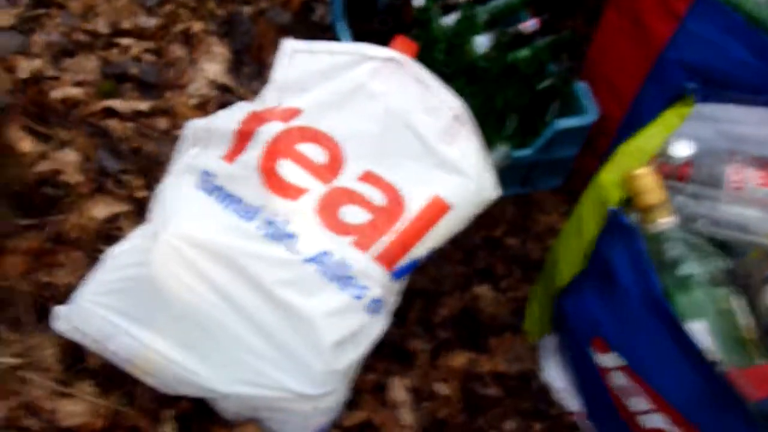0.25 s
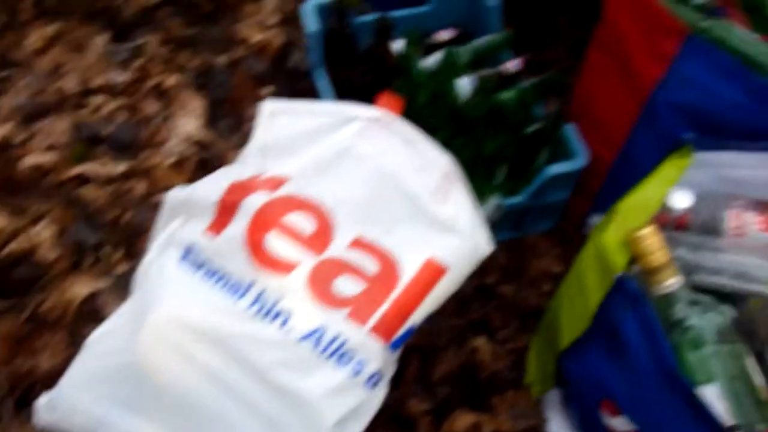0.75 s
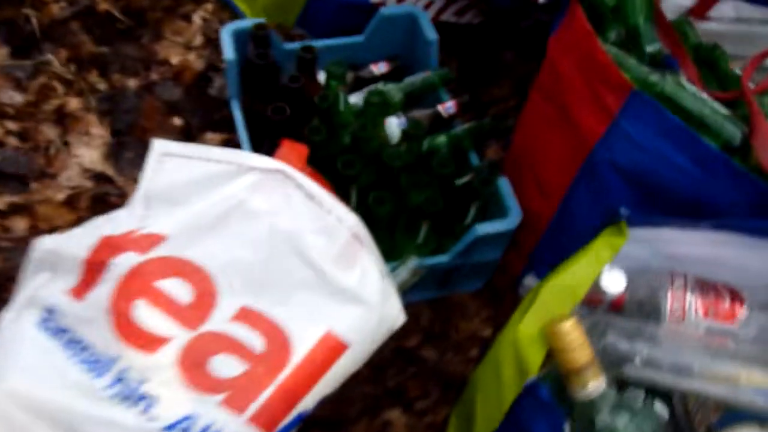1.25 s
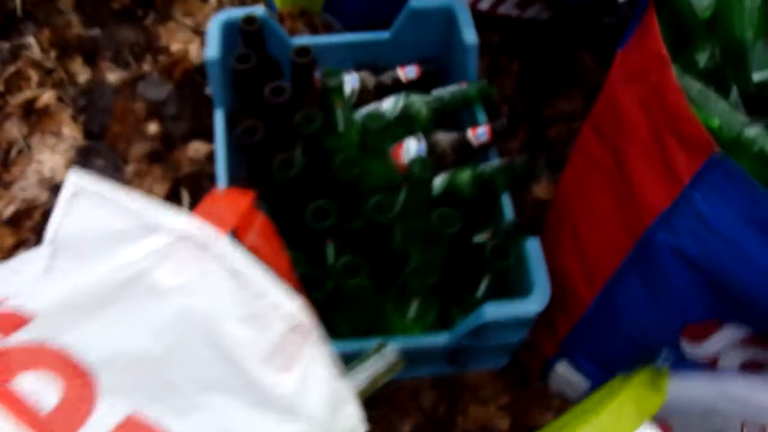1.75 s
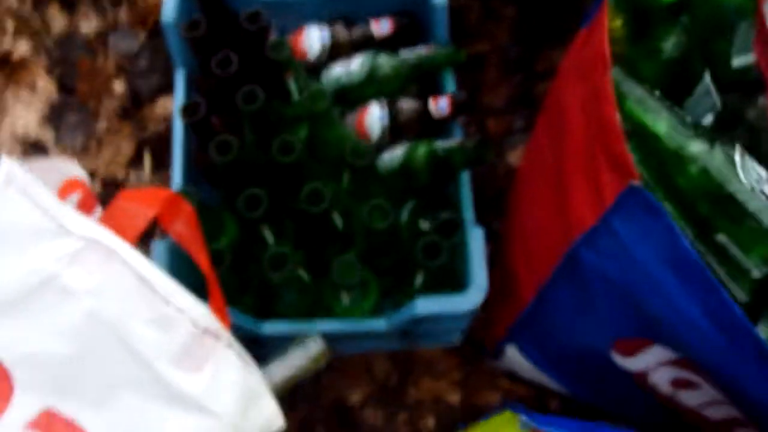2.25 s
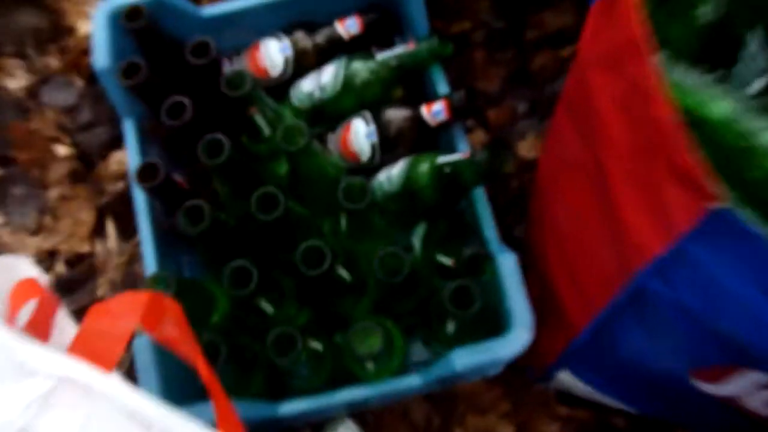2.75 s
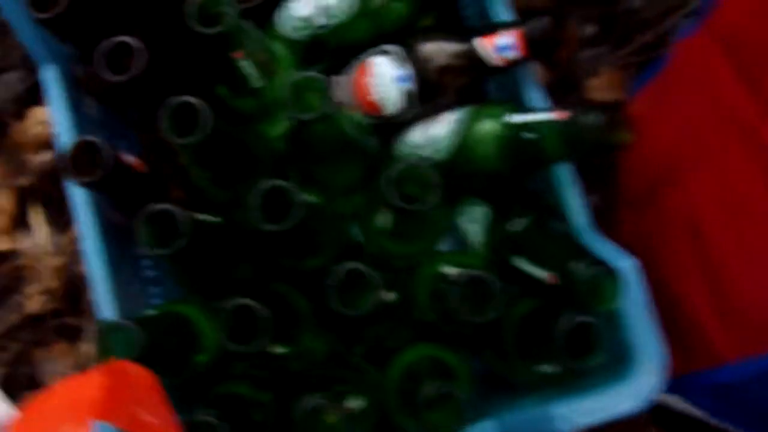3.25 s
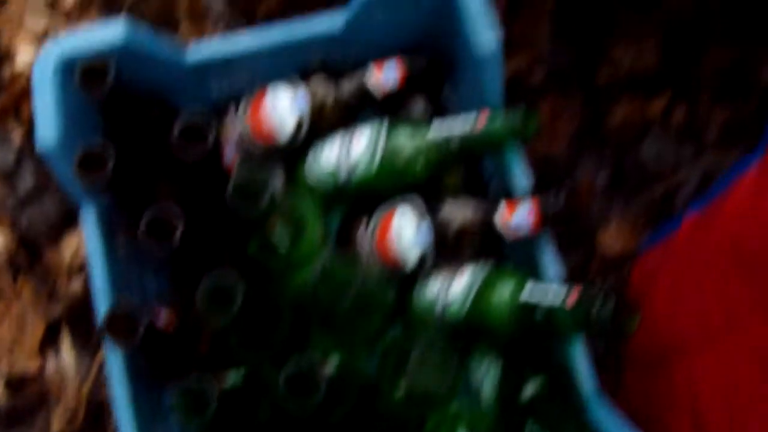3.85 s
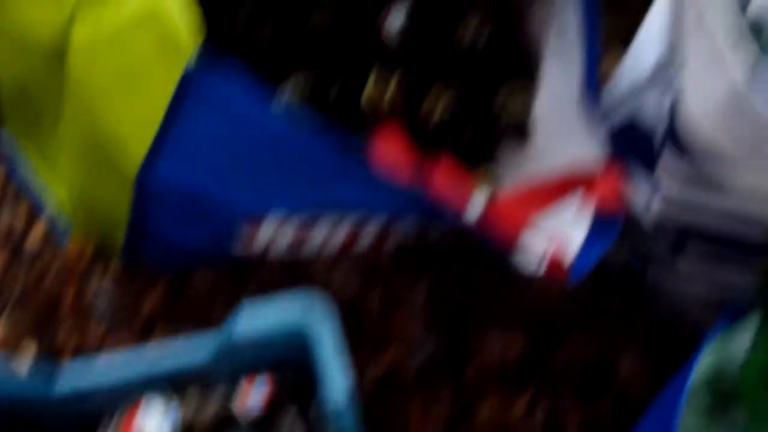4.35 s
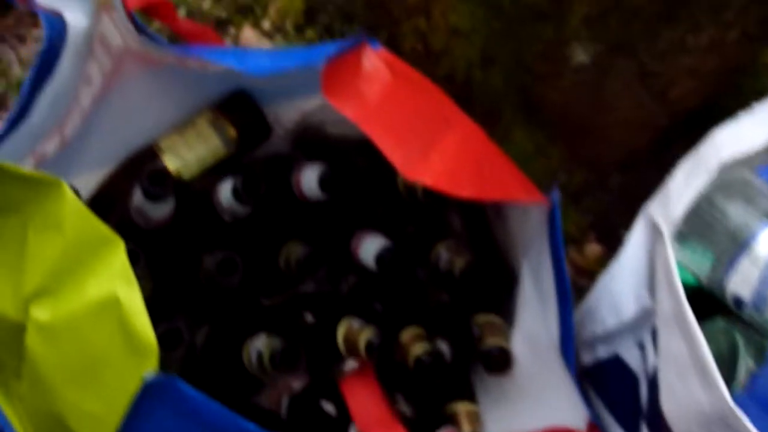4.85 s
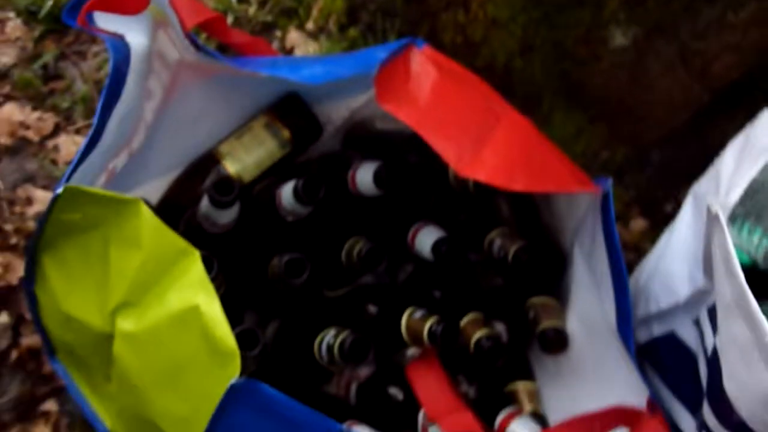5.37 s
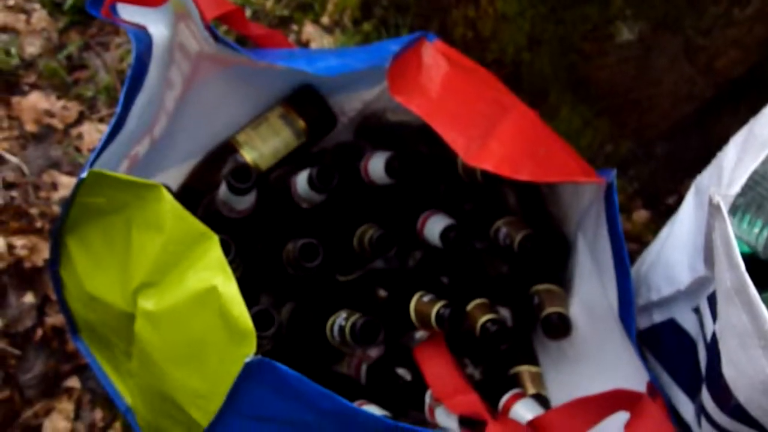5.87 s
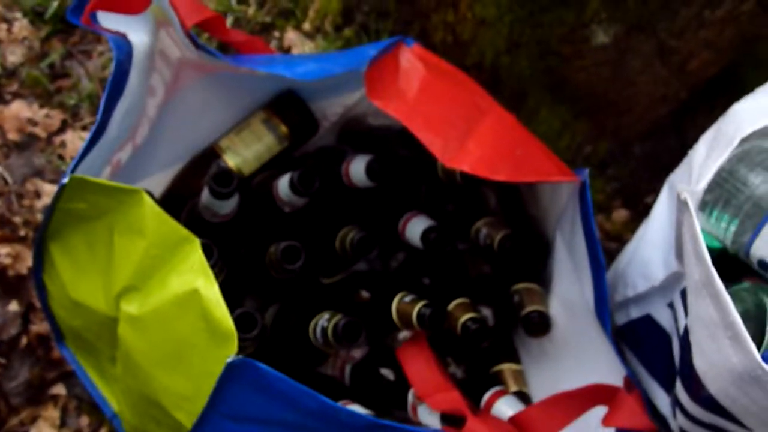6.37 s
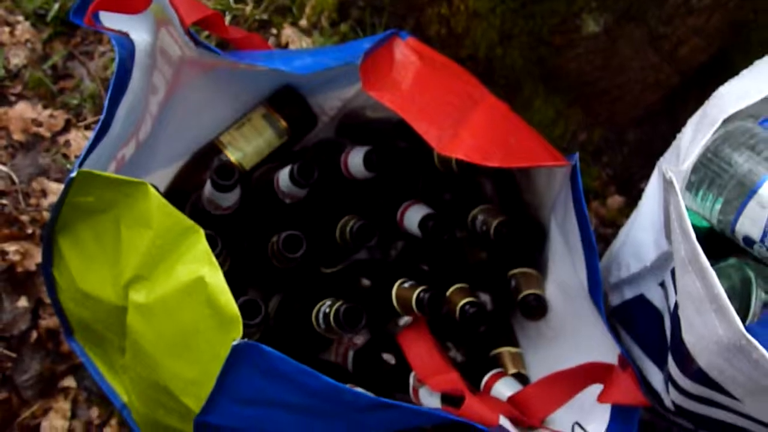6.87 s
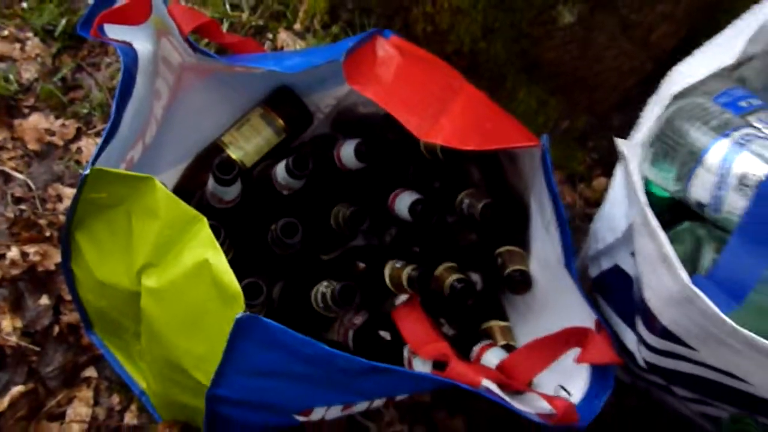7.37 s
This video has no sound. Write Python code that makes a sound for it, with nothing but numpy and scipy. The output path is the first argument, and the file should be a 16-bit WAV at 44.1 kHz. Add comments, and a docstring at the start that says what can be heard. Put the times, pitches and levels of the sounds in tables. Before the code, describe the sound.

Close, dry pops of rain on plastic film with crisp splashy ticks, fine leaf patter, a brief glass clink and barely audible bird whistles.

```python
"""Rain drops thud on stretched plastic film as decaying resonances and crack as they splash in noise bursts.
Under them a patter of tiny rings and noise grains swells as film and dead leaves rustle in light rain.
A few drops sound bottles (decaying sines), glass clinks, a far bird whistles and a low rumble lies below.
A hand-held camera with two close ports hears it through three fixed notches and a top cut."""
import sys
import numpy as np
from scipy import signal
from scipy.fft import rfft, irfft
from scipy.io import wavfile

SR = 44100
rng = np.random.default_rng(int(sys.argv[2]) if len(sys.argv) > 2 else 0)


def store_pcm(level_fs):
    """Save levels as 16-bit WAV."""
    pcm = np.round(np.clip(level_fs, -1, 1) * 32767).astype(np.int16)
    wavfile.write(sys.argv[1], SR, np.atleast_2d(pcm).T)


N = 336042


def from_db(db):
    """Decibels to amplitude gain."""
    return 10 ** (np.asarray(db) / 20)


def rms_one(x):
    """Scale to rms 1."""
    return x / np.sqrt(np.mean(x ** 2) + 1e-20)


def first_rms(x, count=100):
    """Rms of the first samples of a sound's mid."""
    return np.sqrt(np.mean(x[0, :count] ** 2))


def colour(x, points, size=4096):
    """Causal (minimum-phase) filter with the given (Hz, dB) response."""
    hz, db = np.transpose(points)
    grid_hz = np.maximum(np.arange(size // 2 + 1) * SR / size, 1)
    log_gain = np.interp(np.log(grid_hz), np.log(hz), db) * np.log(10) / 20
    # folding the cepstrum onto positive time makes the phase minimal
    cepstrum = irfft(log_gain)
    cepstrum[1:size // 2] *= 2
    cepstrum[size // 2 + 1:] = 0
    response = irfft(np.exp(rfft(cepstrum)))
    return signal.oaconvolve(np.atleast_2d(x), response[None], axes=1)[:, :N]


def ring(x, hz, t60_s):
    """Two-pole resonator: a unit click starts a decaying sine of height about 1."""
    radius = from_db(-60 / (t60_s * SR))
    w = 2 * np.pi * hz / SR
    return signal.lfilter([0, np.sin(w)], [1, -2 * radius * np.cos(w), radius * radius], x)


def add(out, start_s, sound):
    """Mix a short sound in at its start time."""
    i = round(start_s * SR)
    out[..., i:i + sound.shape[-1]] += sound[..., :N - i]


def leaning(pair, lean):
    """Mid and side; a source off centre puts a share of mid into side."""
    lean = np.clip(lean, -.95, .95)
    mid, side = pair
    return np.array([mid, lean * mid + np.sqrt(1 - lean ** 2) * side])


def drift(rate_hz):
    """Slow random curve: normal points of spread 1 joined by straight lines."""
    points = rng.standard_normal(int(N / SR * rate_hz) + 2)
    return np.interp(np.arange(N) / SR * rate_hz, np.arange(len(points)), points)


def lesser(columns, count):
    """Rows of drops at random moments, each column drawn evenly around its mean."""
    mean, scatter = np.transpose(columns)
    draws = rng.random((count, len(columns) + 1))
    start_s = draws[:, 0] * N / SR
    # sqrt(12) gives the even draw a standard deviation of scatter
    values = mean + scatter * np.sqrt(12) * (draws[:, 1:] - .5)
    return np.column_stack([start_s, values])


def low_end(length=3000):
    """Far rumble as coloured noise; soft low pushes as sines decaying over a few cycles."""
    # Each row: frequency in Hz, response in dB.
    rumble_response = [(20, -7), (40, -1), (55, 1), (100, -0.5), (150, -8.5), (300, -14), (2000, -67)]
    # Each row: start in seconds, level in dB, pitch in Hz.
    pushes = [(1.127, -22, 219), (1.298, -23, 226), (2.411, -21, 190), (2.481, -34, 110), (4.035, -25, 326),
              (4.642, -24, 312), (5.282, -34.5, 90)]
    rumble_db = -60.5
    out = from_db(rumble_db) * rms_one(colour(rng.standard_normal((2, N)), rumble_response))
    t = np.arange(length) / SR
    for start_s, db, hz in pushes:
        swing = (1 - np.exp(-t * hz * 8.2)) * from_db(db - 60 * t * hz / 6.1)
        add(out[0], start_s, swing * np.sin(2 * np.pi * hz * t))
    return out * [[1], [1.6]]


def bird():
    """Faint whistles, sines of slightly wavering pitch, off to the left."""
    # Each row: start in seconds, length in seconds, pitch in Hz, level in dB.
    whistles = [(3.49, 0.083, 3980, -53.5), (3.704, 0.26, 3210, -64), (6.496, .09, 4070, -54)]
    out = np.zeros(N)
    waver = 1 + 0.049 * drift(rate_hz=220)
    for start_s, length_s, hz, db in whistles:
        span = slice(round(start_s * SR), round((start_s + length_s) * SR))
        phase = 2 * np.pi * hz * np.cumsum(waver[span]) / SR
        out[span] += from_db(db) * np.sqrt(np.hanning(len(phase))) * np.sin(phase)
    return np.array([out, .5 * out])


def bottles(length=12000):
    """Air in bottle necks hums; glass rings in several modes until the bottles settle together."""
    # Each row: start in seconds, level in dB, pitch in Hz, 60 dB decay time in seconds.
    hums = [(.132, -34, 570, 0.19), (2.417, -11, 537, 0.17), (2.434, -42.5, 115, 1),
            (4.559, -35, 567, 0.21)]
    # Glass on glass. Each row: start in seconds, level in dB.
    strikes = [(2.493, -33), (2.512, -31.5), (2.531, -32)]
    # Each row: mode pitch in Hz, level against the strike in dB, 60 dB decay time in seconds.
    modes = [(2249, 0, .5), (2297, -3, .4), (2869, -1, .1), (3596, -8, .2), (4969, -11, .12),
             (6013, -15, .15), (6257, -10, .15), (6428, -14, .15)]
    settle_s, settle_t60_s, hum_end_s = 2.57, 0.06, .17
    air, glass, t = np.zeros(N), np.zeros(N), np.arange(length) / SR
    for start_s, db, hz, t60_s in hums:
        swing = from_db(db - 60 * t / t60_s) * (1 - np.exp(-t / 0.0012))
        add(air, start_s, swing * np.sin(2 * np.pi * hz * t) * (t < hum_end_s))
    for start_s, db in strikes:
        for hz, mode_db, t60_s in modes:
            add(glass, start_s, from_db(db + mode_db - 60 * t / t60_s) * np.sin(2 * np.pi * hz * t))
    glass *= from_db(-60 * np.maximum(np.arange(N) / SR - settle_s, 0) / settle_t60_s)
    return np.array([air + glass, .6 * air + 0.99 * glass])


def impacts(per_s, spread_db, clump_db):
    """Clicks at random moments, many small and few large, coming in clumps."""
    chance = per_s / SR * from_db(clump_db * drift(rate_hz=25))
    struck = rng.random(N) < chance
    return from_db(spread_db * np.minimum(rng.exponential(1, N), 3)) * struck


def small_taps(clicks, count=12):
    """Each small drop rings one of a set of film patches for a few cycles at the patch's pitch."""
    out, patch = np.zeros((2, N)), rng.integers(0, count, N)
    for k, hz in enumerate(np.geomspace(330, 1900, count)):
        push = np.diff(clicks * (patch == k), prepend=0) + 1e-18
        tap = ring(ring(push, hz, 2.9 / hz), hz, 2.9 / hz)
        out += [tap, tap * (-1) ** k]   # patches alternate in side
    return rms_one(out)


def grains(spectrum, clicks, grain_s, smooth, count=4):
    """Noise over a smooth far part; each impact flares and dies away in one of a few broad bands."""
    out = smooth * from_db(drift(rate_hz=15.0)) * rng.standard_normal((2, N))
    dealt = rng.integers(0, count, N)
    click_rms = np.sqrt(np.mean(clicks ** 2))
    decay = np.exp(-1 / (grain_s * SR))
    for k, hz in enumerate(np.geomspace(2600, 11000, count)):
        flares = signal.lfilter([1], [1, -decay], clicks * (dealt == k) / click_rms + 1e-18)
        band = signal.butter(1, [hz / 1.54, min(hz * 1.33, .45 * SR)], "band", fs=SR, output="sos")
        out += signal.sosfilt(band, flares * rng.standard_normal((2, N)))
    return rms_one(colour(out, spectrum))


def rustle_gain():
    """Gain of the dull and the bright part: steady rain plus rustling swells, added as power."""
    # Steady rain. Each row: time in seconds, dull part in dB, bright part in dB.
    steady = [(0, -50, -51.5), (1.1, -50, -51.5), (2.3, -49.5, -54.5), (3.2, -51, -53.5),
              (4.2, -53.5, -54.5), (4.4, -47.5, -52.5), (4.75, -48, -51), (5.3, -52.5, -56.5),
              (5.9, -54.5, -55), (6.45, -51, -52), (7.2, -53.5, -55.5), (7.62, -50.5, -53.5)]
    # Film and leaves. Each row: peak time, rise and fall in seconds, dull part in dB, bright part in dB.
    rustles = [(0.277, 0.1, 0.13, -45, -45.5), (0.62, 0.097, 0.2, -45, -48.5),
               (.74, 0.11, 0.084, -59, -45.5), (1.29, 0.017, 0.036, -46, -53),
               (1.355, 0.03, 0.041, -35, -42.5), (1.51, 0.11, 0.37, -54.5, -53.5),
               (1.906, 0.073, .14, -47, -51), (2.13, .07, 0.091, -47, -53),
               (2.422, 0.014, 0.12, -35, -40.5), (2.67, 0.13, 0.14, -39.5, -36.5),
               (2.812, 0.094, 0.097, -44, -48), (3.066, 0.074, 0.04, -50, -51.5),
               (3.635, 0.011, 0.045, -52, -56), (4.18, 0.015, 0.054, -54, -48.5),
               (4.35, 0.054, .06, -64, -62), (4.65, 0.011, 0.028, -43, -59), (5.368, .03, .07, -53, -60),
               (6.106, .1, .06, -65, -66), (6.829, .03, 0.05, -52, -70), (6.969, .08, 0.076, -66, -56)]
    edge_db = -9   # one rise before or one fall after the peak
    t = np.arange(N) / SR
    time_s, *steady_db = np.transpose(steady)
    power = np.array([from_db(2 * np.interp(t, time_s, db)) for db in steady_db])
    for peak_s, rise_s, fall_s, *db in rustles:
        away = np.maximum((peak_s - t) / rise_s, (t - peak_s) / fall_s)
        shape = from_db(2 * edge_db * np.minimum(away, 5) ** 2)
        power += np.outer(from_db(2 * np.array(db)), shape)
    return np.sqrt(power)


def patter():
    """Countless small drops: dull on the film, bright on the leaves; film drops sound in both ways."""
    # Each row: frequency in Hz, response in dB.
    dull_response = [(60, -39), (150, 0), (300, 1), (600, 1), (1000, 2), (1500, 1), (2200, -6.5),
                     (3500, -21.5), (8000, -38)]
    # Each row: frequency in Hz, response in dB.
    bright_response = [(200, -68), (700, -26), (1800, -13), (3000, 0.5), (4000, 2), (6300, 1.5), (9000, -1),
                       (12000, -4), (15500, -6)]
    # Where the patter is thickest. Each row: time in seconds, lean to the left from -1 to 1.
    lean_path = [(0, 0.16), (2.3, .1), (2.5, 0.48), (3.2, 0.039), (3.6, 0.15), (4.2, 0.023), (4.6, .15),
                 (5.1, 0.014), (7.62, 0.087)]
    t = np.arange(N) / SR
    dull_gain, bright_gain = rustle_gain()
    on_film = impacts(per_s=250., spread_db=3.5, clump_db=5.0)
    on_leaves = impacts(per_s=250., spread_db=2.5, clump_db=7.5)
    dull = rms_one(colour(rng.standard_normal((2, N)), dull_response)) + 0.75 * small_taps(on_film)
    bright = grains(bright_response, on_film + on_leaves, grain_s=0.0013, smooth=4.4)
    both = dull_gain * rms_one(dull) + bright_gain * bright
    # steady fine hiss of far rain
    treble = signal.butter(2, 9000, "high", fs=SR, output="sos")
    both += from_db(-64.0) * signal.sosfilt(treble, rng.standard_normal((2, N)))
    return leaning(both, np.interp(t, *np.transpose(lean_path)))


def cracks(length=2500):
    """Splash: a noise burst, sharpest at the start, with a broad peak, a top octave and a tail of spray."""
    # Each row: start in seconds, level in dB, centre in Hz, top octave against the body in dB,
    # left-right balance in nominal dB (positive is left).
    splashes = [(.027, -44, 3440, -9, -2), (.1282, -47, 5870, -14, 5), (0.167, -42, 6060, -17, 2),
                (0.33, -41, 4660, 0, 1), (.412, -43, 6300, -11, -3), (0.435, -37.5, 4440, -10, 10),
                (0.6152, -38.5, 6000, -7, -4), (.703, -39, 7100, -7, -2), (.84, -39, 5150, -10, 9),
                (0.8866, -38.5, 6640, -25, 1), (0.9783, -46.5, 6540, 8.5, 4), (1.0599, -38, 6250, 3.5, 7),
                (1.1276, -23.5, 5700, -0.5, 6), (1.2172, -32.5, 4400, -12, -2),
                (1.2822, -30.5, 5710, -22, 5), (1.3, -21.5, 5680, -29, 11), (1.362, -35, 5780, -11, -3),
                (1.3722, -35, 6450, -9, -5), (1.489, -37.5, 6600, -12, 13), (1.609, -38, 4270, -3, -4),
                (1.6225, -39, 5060, -8, 12), (2.4134, -44, 3540, -13, 8), (2.4402, -28, 5940, -8, 12),
                (2.4832, -36, 3330, -11, 1), (2.6738, -28, 6000, -14, 13), (2.713, -34, 6430, -3, 3),
                (2.789, -28.5, 4130, -10, -1), (2.8266, -35, 5150, 4, -4), (2.9561, -36, 6500, -15, 11),
                (3.0366, -31, 4100, -10, 18), (3.0884, -37.5, 4560, -6, 9), (3.2527, -43, 6300, 0.5, -4),
                (3.33, -42.5, 4100, -10, 9), (3.4713, -43.5, 6140, 0.5, 7), (3.6273, -37.5, 6750, -22, 1),
                (4.037, -31, 4850, -35, -17), (4.175, -35.5, 5560, -12, 16), (4.303, -43, 4520, -8, -1),
                (4.3311, -41, 5860, -12, 1), (4.3665, -35.5, 6700, -27, 4), (4.644, -30, 5920, -20, 12),
                (4.7437, -41, 6500, -13, 2), (4.7685, -39, 5500, -11, 20), (4.908, -37, 6360, -1, 2),
                (4.9148, -35.5, 6660, -30, -11), (5.0997, -43, 5600, -10, -11), (5.1968, -45, 6070, 1, -11),
                (5.3058, -45.5, 5390, 5.5, 4), (5.3289, -42.5, 4540, -1, -2), (5.359, -41, 5350, -8, -14),
                (5.379, -38.5, 6880, -16, -10), (5.5053, -42, 5530, -9, 9), (5.7686, -39.5, 3800, -3, 4),
                (5.9454, -49, 4470, 4.5, 0), (6.09, -44, 5330, -18, 9), (6.12, -42, 5350, 2, 6),
                (6.527, -38, 3340, 0, 10), (6.6147, -40.5, 4020, 0.5, 9), (6.7835, -41, 4040, -11, 5),
                (6.8354, -40, 6100, 0, -1), (7.1237, -48, 6340, 2, -5), (7.2037, -44, 6280, -15, 8),
                (7.224, -42, 5780, -11, 8), (7.271, -41, 4540, 2.5, 8), (7.33, -45.5, 5200, -18, -2)]
    # Random lesser cracks, a row for each of level (dB), centre (Hz), top octave (dB), balance (dB): mean, scatter.
    lesser_spread = [(-48, 2.3), (5500, 810), (-4.5, 4.3), (2.5, 6)]
    spray_at_38_db, spray_spread_db, spray_loss = -13, 1, 0.23   # loss: dB per dB of crack above -38 dB
    spray_t60_s, burst_decay_s, attack_s = 0.048, 0.00067, 0.00027
    out, t = np.zeros((2, N)), np.arange(length) / SR
    top = signal.butter(1, [8500, 12500], "band", fs=SR, output="sos")
    drops = np.vstack([lesser(lesser_spread, count=33), splashes])
    wetness = rng.standard_normal(len(drops))
    noise = rng.standard_normal((len(drops), 2, length))
    for (start_s, db, hz, top_db, pan_db), wet, hiss in zip(drops, wetness, noise):
        spray_db = spray_at_38_db + spray_spread_db * wet - spray_loss * (db + 38)
        envelope = np.exp(-t / burst_decay_s) + from_db(spray_db - 60 * t / spray_t60_s)
        burst = hiss * envelope * (1 - np.exp(-t / attack_s))
        body = signal.lfilter([1, 0, -1], 1, ring(burst, hz, 2.96 / hz))
        air = signal.sosfilt(top, burst)
        sound = body / first_rms(body) + from_db(top_db) * air / first_rms(air)
        add(out, start_s, from_db(db) * leaning(sound, np.tanh(pan_db / 12)))
    return out


def thuds(length=3000):
    """The blow swings the film for a few cycles; it then flutters as noise around that pitch."""
    # Each row: start in seconds, peak of the blow in dB, film pitch in Hz,
    # sharpness (the ring lasts longer as it grows), flutter against the blow in dB.
    blows = [(.0283, -25.5, 800, 3.5, -11), (.1143, -27, 1200, 1.06, -32), (.1285, -24, 794, 1.4, -6),
             (.2568, -29, 586, 4.4, -25), (.3299, -19, 620, 7.6, -29), (.4121, -31.3, 1580, 4.5, -30),
             (.4346, -28.5, 1280, 8.5, -16), (.5008, -30, 1050, 2.4, -30), (.5446, -28, 650, 2.9, -6),
             (.612, -33, 800, 2.2, -3), (.6285, -32, 600, 2, -2), (.6485, -26, 1200, 5.4, -25),
             (0.704, -31, 680, 2.7, -30), (1.0604, -30, 1650, 4, -18), (1.1156, -35, 328, 2.1, -4),
             (1.1283, -10, 960, 1.9, -20), (1.2173, -11.5, 945, 3.2, -17.5), (1.2822, -14, 930, 1.8, -22),
             (1.2908, -31, 1200, 1.5, -16), (1.3003, -11, 800, 3.4, -8.5), (1.306, -30, 900, 2.7, -19),
             (1.6742, -25, 566, 2, -11), (1.7176, -28.5, 1260, 1.9, -12), (1.7568, -29, 960, 1.9, -31),
             (1.8922, -30, 1340, 5.7, -6), (2.1169, -25.5, 1360, 7.3, -14),
             (2.4111, -12.5, 1270, 4.7, -6.5), (2.484, -1.6, 1223, 11, -19), (2.4925, -16.5, 905, 2.9, -17),
             (2.511, -24.5, 780, 5.9, -21), (2.6195, -26.5, 800, 2, -8), (2.6974, -23.5, 710, 4.8, -30),
             (2.7128, -21.5, 870, 2.8, -27), (2.7893, -19.5, 544, 0.87, -13),
             (2.8272, -21.5, 1610, 1.5, -32), (2.8485, -23, 710, .63, -13), (2.8919, -23, 813, 2.5, -8.5),
             (2.9562, -29.5, 890, 0.88, -9), (3.0364, -28.5, 870, 5.1, -3), (3.0886, -32.5, 960, 3.5, -2.5),
             (3.6416, -33.5, 805, 3.1, -1.5), (3.6954, -32, 1200, 5.7, -14), (4.037, -14, 724, .51, -10.5),
             (4.1758, -33, 890, 1.4, -9), (4.3476, -30, 600, 1.8, -30), (4.3925, -30, 855, 1.1, -12),
             (4.643, -17, 910, 8, -7), (4.658, -29, 900, 2, -14), (4.6936, -23, 870, 4.5, -32),
             (4.9146, -33.5, 1220, 2.5, -18), (5.3598, -28, 660, 2.4, -3), (5.3807, -27.5, 520, 2, -31),
             (5.5676, -29.5, 566, 6.7, -6.5), (6.0233, -40.5, 1630, 18, -24), (6.041, -36, 530, 8.2, -31),
             (6.0897, -34.5, 1530, 3.6, -7), (6.3633, -33.5, 890, 3.5, -13), (6.6153, -35, 780, 1.2, -30),
             (6.6351, -29, 800, 1.7, -9.5), (6.8141, -21, 1010, 3.5, -11.5), (6.9858, -29, 730, 1.2, -25.5),
             (7.2714, -38, 510, 2.3, -3.5), (7.331, -30.5, 970, 1.4, -7.5)]
    # Random lesser thuds, a row for each of peak (dB), pitch (Hz), sharpness, flutter (dB): mean, scatter.
    lesser_spread = [(-38.5, 3.8), (854, 210), (2.5, 0.54), (-11, 6.1)]
    flutter_t60_s, flutter_attack_s = 0.041, 0.00027
    out, t = np.zeros((2, N)), np.arange(length) / SR
    drops = np.vstack([lesser(lesser_spread, count=30), blows])
    noise = rng.standard_normal((len(drops), length))
    push = np.diff(1. * (t == 0), prepend=0)
    for (start_s, db, hz, sharpness, flutter_db), hiss in zip(drops, noise):
        t60_s = 0.68 * max(sharpness, .6) / hz   # of each of two resonators in series
        blow = ring(ring(push, hz, t60_s), hz, t60_s)
        flutter = rms_one(ring(np.diff(hiss, prepend=0), hz, 3.8 / hz))
        flutter = flutter * from_db(flutter_db - 60 * t / flutter_t60_s)
        sound = blow / np.abs(blow).max() + flutter * (1 - np.exp(-t / flutter_attack_s))
        random_sign = np.sign(hiss[0])   # puts the drop on either side
        add(out, start_s, from_db(db) * np.array([sound, sound * random_sign]))
    return out


def scene():
    """All sources as mid and side; the close ports hear little side below the treble."""
    # Side against mid. Each row: frequency in Hz, gain in dB.
    side_response = [(60, -32), (99, -23), (160, -23.5), (270, -21.5), (450, -21.5), (740, -16),
                     (1220, -16), (2010, -6), (3330, -1.5), (5500, -3.5), (9080, 0.5), (15000, 4)]
    mid, side = patter() + thuds() + cracks() + bottles() + bird() + low_end()
    side = colour(side, side_response)[0]
    return np.array([mid + side, mid - side])


def record(dry):
    """Three notches tame the housing's resonances; the deepest bass and the top are cut."""
    # Each row: centre in Hz, width in Hz, depth in dB.
    dips = [(2615, 520, -24), (4625, 800, -23), (7905, 560, -14)]
    bass_cut_hz, treble_cut_hz, stop_hz = 45, 15200, 16470
    for hz, width_hz, db in dips:
        w = 2 * np.pi * hz / SR
        pole = np.exp(-np.pi * width_hz / SR)
        zero = np.exp(-np.pi * width_hz * from_db(db) / SR)
        top = [1, -2 * zero * np.cos(w), zero ** 2]
        bottom = [1, -2 * pole * np.cos(w), pole ** 2]
        dry = signal.lfilter(top, bottom, dry)
    dry = signal.sosfilt(signal.butter(2, bass_cut_hz, "high", fs=SR, output="sos"), dry)
    dry = signal.sosfilt(signal.cheby1(6, .5, treble_cut_hz, fs=SR, output="sos"), dry)
    return signal.sosfilt(signal.cheby2(12, 70, stop_hz, fs=SR, output="sos"), dry)


dry = scene()
out = record(dry)
store_pcm(out)
```